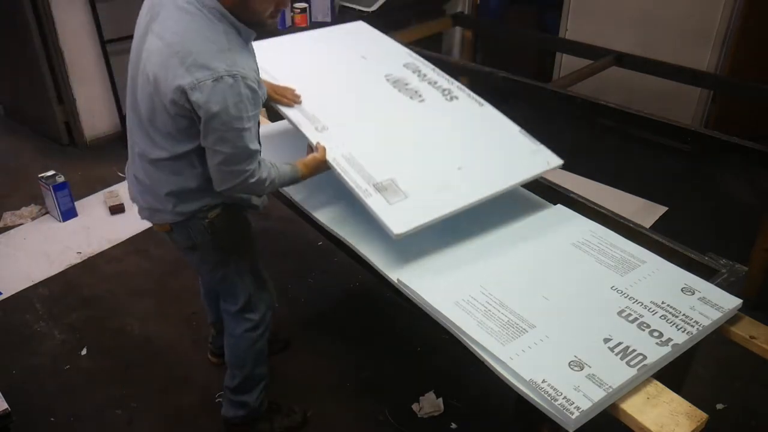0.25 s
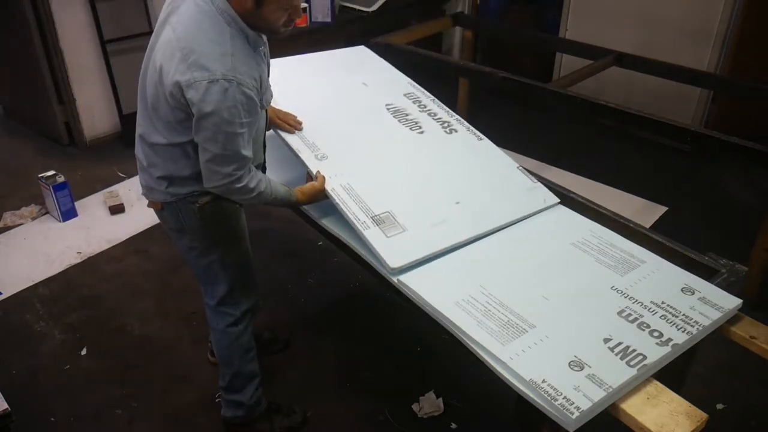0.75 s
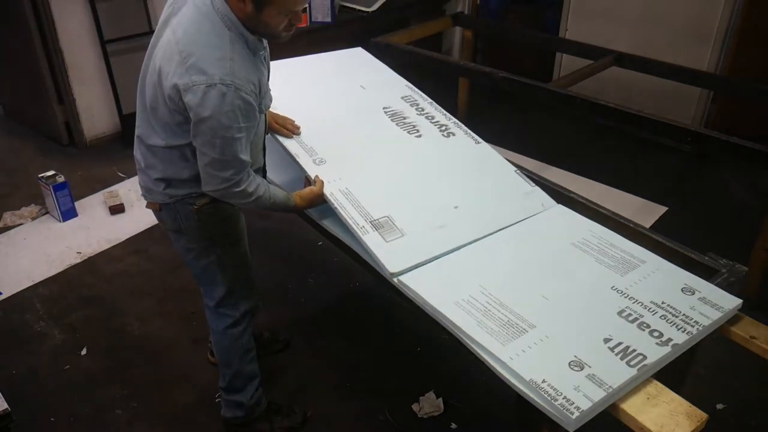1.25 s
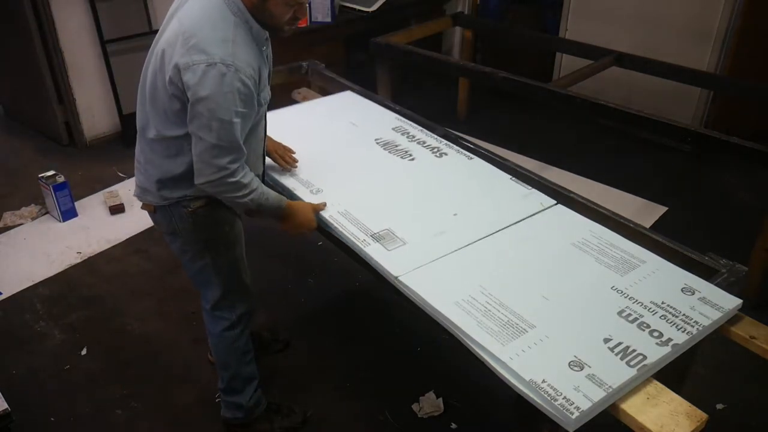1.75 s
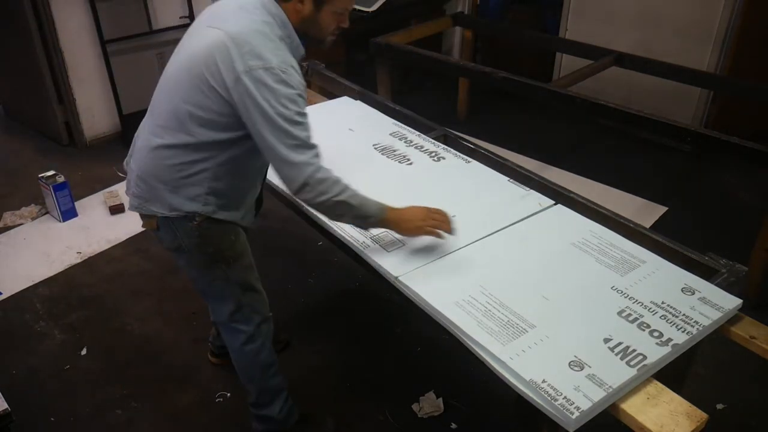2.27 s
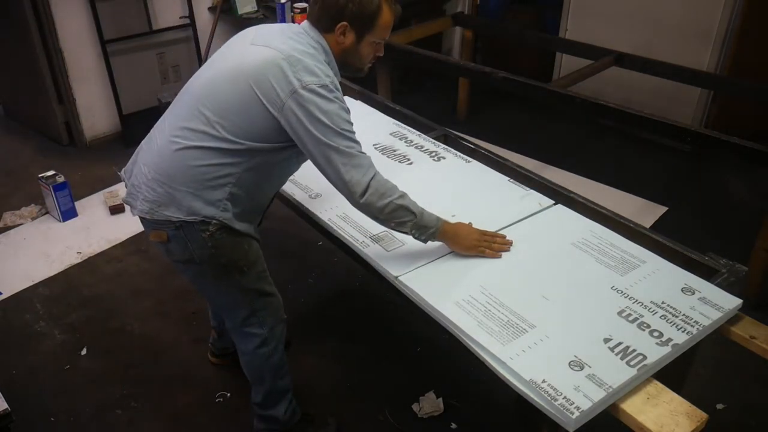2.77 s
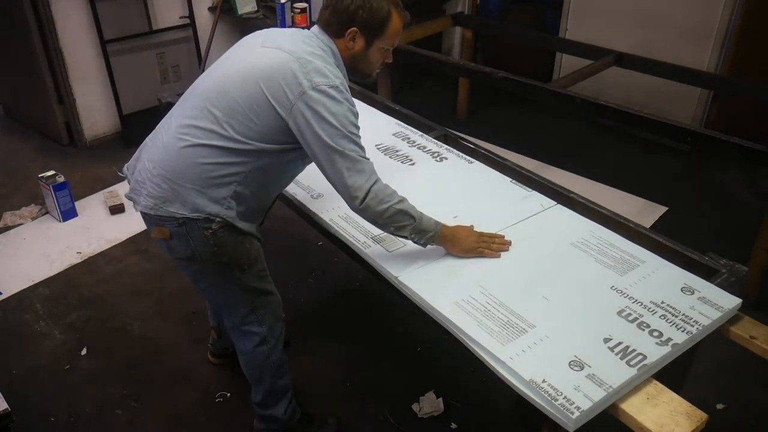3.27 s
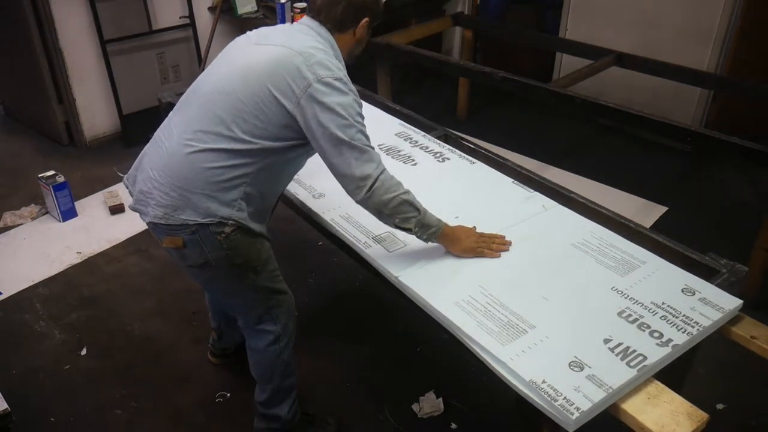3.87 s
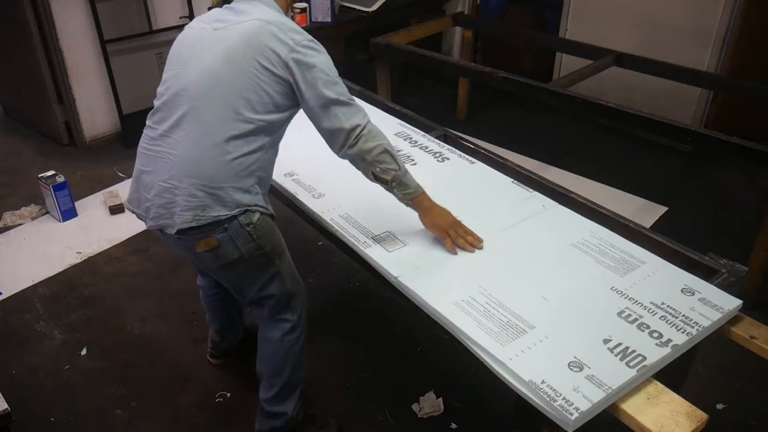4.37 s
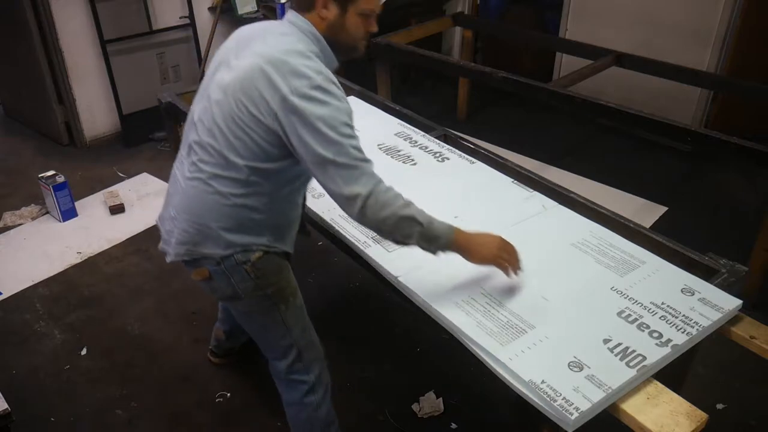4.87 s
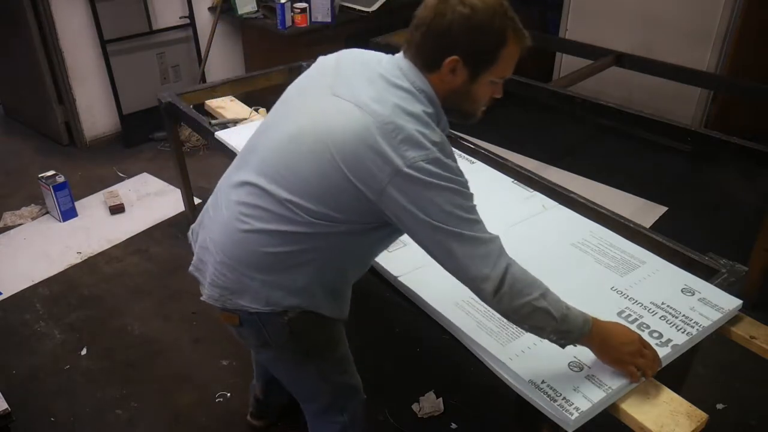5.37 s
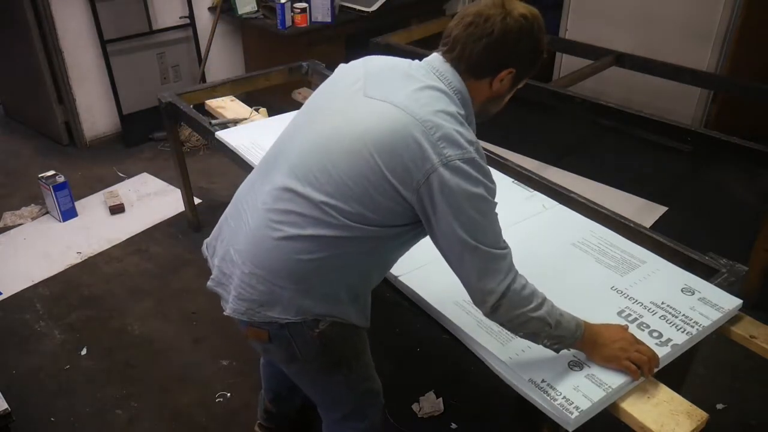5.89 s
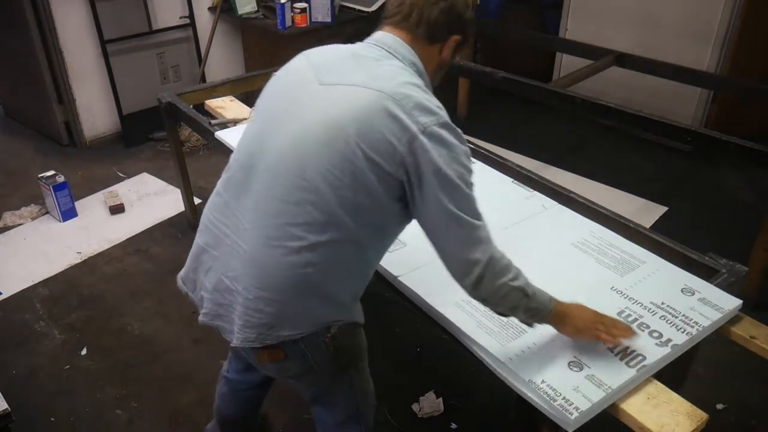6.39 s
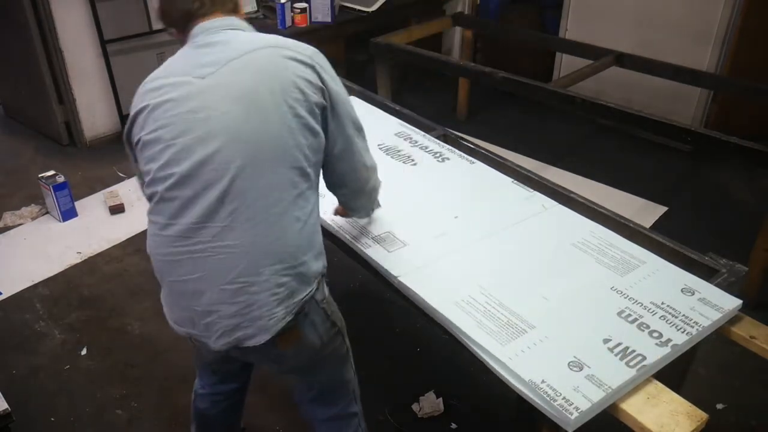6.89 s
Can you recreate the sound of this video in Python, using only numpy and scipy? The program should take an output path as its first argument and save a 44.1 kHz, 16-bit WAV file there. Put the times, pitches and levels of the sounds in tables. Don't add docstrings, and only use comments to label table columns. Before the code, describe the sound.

A reverberant, hard-walled workshop with steady low air noise and a faint machine hum that swells after the start. At about 0.1 s a rigid foam board hits another with a loud, hollow, squeaky scrape and knock, its tail ringing briefly. From 0.45 to 1.4 s come dull drags, crisp small edge taps, short dry creaks and soft low thuds near 0.6 and 1.0 s. More settling knocks fall at 1.7, 2.07 and 2.17 s, with a faint thin squeal afterwards. From 2.5 to 3.7 s it is nearly quiet: light palm brushing and tiny ticks. Around 3.8-4.6 s soft broken squeals and breathy rubs appear with a click or two. At 5.0-5.5 s strong gritty scuffs, squeaks and crunchy knocks burst out, then fade. Faint brushing leads to a sharp loud squeaky knock at 6.45 s, followed by softer rubs, sleeve rustle and tiny ticks until 7.1 s.

```python
import sys
import numpy as np
from scipy import signal
from scipy.fft import rfft, irfft
from scipy.io import wavfile

SR = 44100
rng = np.random.default_rng(int(sys.argv[2]) if len(sys.argv) > 2 else 0)


def volts(x):
    e = np.asarray(x, float) / 20
    return 10 ** e


def to_wav(s):
    ch = np.atleast_2d(s).T
    pcm = np.round(np.clip(ch, -1, 1) * 32767)
    wavfile.write(sys.argv[1], SR, pcm.astype(np.int16))


N = 314874
STEP = 32


def at_hz(points, hz):
    table = np.array(points)
    return np.interp(np.log(hz), np.log(table[:, 0]), table[:, 1])


def rms_one(x):
    return x / np.sqrt(np.mean(x ** 2) + 1e-20)


def coloured(x, spectrum):
    size = x.shape[-1]
    hz = np.maximum(np.arange(size // 2 + 1) * SR / size, 1)
    return irfft(rfft(x) * volts(at_hz(spectrum, hz)), size)


def band(x, low_hz, high_hz):
    edges_hz = [low_hz, min(high_hz, .45 * SR)]
    return signal.sosfilt(signal.butter(2, edges_hz, "band", fs=SR, output="sos"), x + 1e-18)


def resonance(x, hz, width_hz):
    r = np.exp(-np.pi * width_hz / SR)
    poles = [1, -2 * r * np.cos(2 * np.pi * hz / SR), r * r]
    return signal.lfilter([(1 - r * r) / 2, 0, (r * r - 1) / 2], poles, x + 1e-18)


def steps():
    return np.arange(N // STEP + 2) * STEP / SR


def drift(rate_hz):
    r = np.exp(-2 * np.pi * rate_hz * STEP / SR)
    wander = signal.lfilter([1], [1, -2 * r, r * r], rng.standard_normal(len(steps()) + 2000))
    return rms_one(wander[2000:])


def grit(per_s, spread_db):
    sizes = volts(spread_db * np.minimum(rng.exponential(1, N), 5)) * rng.choice([-1, 1], N)
    return rms_one(sizes * (rng.random(N) < per_s / SR))


def strokes(rows, colour, release_s, hz):
    pivot_hz = 2500
    s, rise, hold, db, tilt = np.transpose(rows)[:, :, None]
    late = steps() - s
    rising = late / np.maximum(rise, 1 / SR)
    falling = (hold - late) / release_s
    shape_db = 20 * np.minimum(np.minimum(rising, falling), 0)
    band_db = db + at_hz(colour, hz) + tilt * np.log2(hz / pivot_hz)
    return (volts(band_db) ** 2).T @ volts(shape_db) ** 2


def rubbing():
    # full_contact_s, rise_s, hold_s, level_db, tilt_db_per_octave
    slides = [(0, .05, 0.13, -47.5, -5), (.107, 0.006, 0.065, -23.5, -1), (.2, .03, 0.044, -31.5, -1),
              (.3, .03, 0.12, -45.5, -2.5), (3.93, 0.075, 0.037, -49, 1.5), (4.03, 0.053, 0.084, -33, 2.5),
              (4.2, 0.18, 0.059, -41.5, -1.5), (4.31, 0.041, 0.12, -38.5, 1), (4.44, .05, .13, -38, -0.5),
              (4.62, 0.055, 0.12, -49.5, -4), (4.96, 0.059, 0.096, -39, 1.5),
              (5.085, 0.057, 0.033, -26.5, 2.5), (5.13, 0.1, 0.083, -26, 1.5),
              (5.24, 0.057, 0.073, -24.5, 1), (5.33, 0.027, 0.067, -25, -1),
              (5.385, 0.012, 0.021, -24.5, -3), (5.44, .03, 0.1, -36, -2), (5.6, 0.064, 0.12, -48.5, -2),
              (5.75, 0.046, 0.045, -57, -3), (6.43, 0.012, 0.042, -25, 1), (6.49, .02, 0.058, -32, -2),
              (6.6, .02, 0.032, -41.5, 0.5), (6.75, 0.12, 0.1, -33.5, 0), (6.88, 0.036, 0.075, -42.5, -2.5),
              (7.03, 0.057, 0.12, -47.5, -1)]
    presses = [(.455, 0.034, 0.029, -39, 0.5), (.6, 0.029, 0.074, -39.5, -1),
               (.75, 0.011, .03, -42.5, -0.5), (.86, 0.044, 0.077, -47, -1), (.97, 0.005, 0.019, -39, 2),
               (1.02, .02, 0.049, -57.5, -4.5), (1.07, .02, 0.039, -54, 6), (1.13, .02, 0.073, -57, -2.5),
               (1.21, .02, 0.068, -48.5, 1.5), (1.4, 0.037, 0.014, -46, 0), (1.69, 0.067, 0.028, -41, 0),
               (1.79, 0.016, 0.041, -44.5, 0), (1.89, .03, 0.033, -50, 0), (2.07, 0.0077, 0.013, -36, 3.5),
               (2.172, 0.0036, 0.03, -36, 1.5), (2.25, 0.024, 0.035, -59.5, -6.5),
               (2.35, 0.022, 0.093, -51, 8), (3.97, 0.15, 0.064, -46, 0), (4.05, 0.078, 0.1, -35, 1.5),
               (4.36, 0.18, 0.25, -46, 0), (4.81, 0.024, 0.21, -53, -2), (5.4, .04, 0.025, -49, 5),
               (6.3, 0.17, 0.017, -44, 1.5), (6.44, .015, 0.019, -28, 3), (6.82, 0.2, 0.02, -33, 2.5)]
    brushes = [(.558, 0.0076, 0.0097, -44, -4.5), (.581, 0.0046, 0.016, -36.5, 3),
               (.61, 0.0087, 0.056, -42.5, 1.5), (.8, 0.15, 0.054, -46, -1.5),
               (.865, 0.07, .015, -40.5, 3.5), (1.195, 0.0092, 0.028, -47, -3.5),
               (1.4, 0.11, 0.065, -47.5, 1), (1.6, 0.14, .04, -56, -4.5), (1.69, 0.069, 0.032, -39.5, -1),
               (1.77, .03, 0.078, -47, -0.5), (1.88, .03, 0.031, -45.5, 0), (1.95, .03, 0.14, -51.5, -1.5),
               (2.07, 0.025, 0.035, -47, -1.5), (2.172, 0.0014, 0.0095, -34.5, 2),
               (2.21, .01, 0.13, -46, -3.5), (2.61, 0.07, 0.056, -52.5, 0), (2.69, 0.045, 0.058, -50, 0.5),
               (2.93, 0.046, 0.089, -59, -1), (3.3, 0.12, 0.042, -52, 1.5), (3.57, 0.061, 0.076, -45.5, 0),
               (4.83, 0.058, 0.091, -50, 0.5), (6.2, 0.1, 0.11, -52, 1), (6.29, 0.068, 0.017, -41, 2.5),
               (6.35, .02, .03, -54, -5)]
    rustles = [(0, 0.043, 0.12, -48, -4), (.77, .02, 0.09, -62, 2.5), (1.19, 0.0091, 0.018, -61, 0),
               (1.55, .04, 0.15, -63.5, 0), (1.76, .03, 0.14, -60, 1.5), (2.06, .03, 0.083, -74, -6),
               (3.87, .04, .08, -65, -1), (4.32, 0.031, 0.12, -52, 0), (4.5, .03, .04, -59, 0.5),
               (4.63, .04, 0.27, -56.5, -3), (4.9, 0.025, .06, -62, -2), (5.03, .04, 0.045, -56, 0.5),
               (6.19, .03, 0.037, -70, 3.5), (6.78, 0.076, 0.042, -55.5, 1.5), (7.1, .04, .05, -61, 0),
               (4.2, .04, .08, -58, -2.5)]
    # hz, level_db
    slide_colour = [(250, -34), (550, -17), (850, -9.5), (1300, -3.5), (1900, -6), (3100, -4),
                    (5600, -10.5), (11000, -19)]
    press_colour = [(200, -14.5), (480, -5), (850, -6), (1220, -6), (1540, -10.5), (3100, -19), (5600, -20),
                    (11000, -40)]
    brush_colour = [(200, -37), (480, -20), (850, -15.5), (1300, -6), (1900, -5.5), (3100, -4), (5600, -8),
                    (11000, -12)]
    rustle_colour = [(1300, -23), (3100, 0), (5600, 2.5), (8000, -5.5), (11000, 7), (15000, 2.5)]
    # mode_hz, width_hz, level_db
    board = [(1155, 180, 2), (3150, 4400, 3.5), (690, 300, 2.5), (4330, 200, -5.5)]

    edges_hz = 136 * 2 ** np.arange(0, 7.1, 1 / 3)
    centres_hz = np.sqrt(edges_hz[1:] * edges_hz[:-1])
    power = strokes(slides, slide_colour, 0.066, centres_hz)
    power = power + strokes(presses, press_colour, 0.071, centres_hz)
    power = power + strokes(brushes, brush_colour, 0.081, centres_hz)
    power = power + strokes(rustles, rustle_colour, .04, centres_hz)

    slips = [grit(9000, spread_db=2.5) for _ in range(2)]
    surge = drift(50)
    out = np.zeros(N)
    for k, (low_hz, high_hz, hz) in enumerate(zip(edges_hz, edges_hz[1:], centres_hz)):
        slope_db = -14.5 * max(np.log2(hz / 11000), 0) - 5.5
        waver_db = 1.2 * surge + .9 * drift(10)
        gain = np.sqrt(power[k]) * volts(slope_db + waver_db)
        noise = rms_one(band(slips[k % 2], low_hz, high_hz))
        out += np.interp(np.arange(N) / SR, steps(), gain) * noise
    return out + sum((volts(db) - 1) * resonance(out, hz, width) for hz, width, db in board)


def room_tone():
    # hz, level_db_per_hz
    air = [(12, -50), (22, -1.5), (101, 0.5), (319, -12.5), (1150, -12.5), (1660, -17.5), (3740, -19.5),
           (4060, -27), (4540, -21), (7110, -30.5), (11800, -31.5), (14700, -37), (16000, -36)]
    # time_s, level_db
    hum_swell = [(0, -16), (1.5, 9), (2.5, 5.5), (3.7, 3.5), (4.6, 11.5), (7.14, 12)]
    # hz, level_db
    self_noise = [(30, -74), (120, -87), (300, -85), (1000, -100), (5000, -103.5), (8000, -100),
                  (15000, -93)]
    mid = volts(-55) * rms_one(coloured(rng.standard_normal(N), air))
    hum = rms_one(resonance(rng.standard_normal(N), 100, width_hz=4.2))
    hum_db = -73 + np.interp(np.arange(N) / SR, *np.transpose(hum_swell))
    side = coloured(rng.standard_normal(N), self_noise) * volts(21.0)
    return mid + volts(hum_db) * hum, side


def squeaks():
    # start_s, length_s, pitch_hz, width_hz, level_db
    locked = [(.115, 0.074, 1076, 250, -31), (.11, 0.084, 2620, 1460, -30), (0.69, 0.029, 1144, 170, -42.5),
              (0.744, 0.038, 1150, 300, -46.5), (0.967, 0.033, 1120, 160, -43), (1.4, 0.05, 2900, 400, -55),
              (1.198, 0.045, 2950, 400, -54), (1.362, .04, 2950, 400, -57), (.968, .1, 850, 700, -48),
              (1.03, .05, 1180, 150, -50), (1.4, 0.04, 560, 150, -55), (1.699, 0.072, 5080, 830, -50),
              (2.171, 0.039, 5200, 900, -45), (2.182, 0.11, 1240, 180, -43), (4.29, .08, 3000, 200, -52),
              (6.462, .06, 1150, 300, -33), (6.5, .1, 900, 400, -36), (6.455, .04, 3200, 700, -33),
              (1.4, 0.025, 1000, 150, -57), (0.84, 0.064, 2860, 630, -52.5),
              (5.241, 0.05, 1145, 190, -32.5), (5.4, 0.12, 2320, 1100, -36.5),
              (5.378, 0.035, 1170, 260, -26), (6.424, 0.031, 3200, 620, -30.5),
              (0.09, 0.034, 1130, 120, -48), (.11, 0.118, 740, 200, -41), (0.24, .09, 782, 150, -45),
              (2.172, 0.043, 1720, 120, -45), (2.172, 0.035, 554, 200, -45.5), (4.8, .05, 650, 300, -58),
              (5.2, 0.044, 1220, 260, -36), (5.415, 0.035, 1260, 140, -33),
              (5.375, 0.034, 2200, 500, -31.5), (.592, 0.055, 650, 240, -47), (.99, 0.039, 420, 200, -50),
              (1.025, 0.032, 1130, 200, -51), (4.045, .04, 510, 170, -49), (1.705, 0.057, 646, 200, -49),
              (2.065, .04, 600, 200, -52.5), (3.94, 0.043, 1120, 110, -53), (1.665, 0.024, 2600, 2300, -45),
              (1.795, 0.052, 1000, 830, -51), (1.73, 0.065, 3600, 500, -54)]
    white = rng.standard_normal((len(locked), SR // 4))
    t, out = np.arange(SR // 4) / SR, np.zeros(N)
    for noise, (s, length, hz, width, db) in zip(white, locked):
        gate = np.clip(np.minimum(t / 0.00032, (length - t) / 0.027), 0, 1)
        tone = rms_one(resonance(resonance(noise, hz, width), hz, width))
        out[round(s * SR):][:len(t)] += volts(db + 5.0) * gate * tone
    return out


def knocks():
    # start_s, peak_db, low_above_peak_db, bright_above_peak_db, contact_s
    edge_knocks = [(0.104, -24, -5, -28, 0.0081), (0.558, -30, -13, 3, 0.0039), (.578, -31, -1, 13, 0.011),
                   (.9677, -60, 22, -14, 0.026), (1.1854, -51, 3, -20, 0.014), (1.396, -46, 4, -7, 0.0071),
                   (1.701, -25, -14, -12, 0.018), (2.068, -40, -14, -4, 0.014), (2.171, -24, 0, -29, 0.012),
                   (5.06, -30, -5, -14, 0.01), (5.379, -21, -7, -20, 0.0035), (5.388, -22, -21, -16, 0.004),
                   (6.418, -25, 5.5, -9, 0.014), (6.424, -34, -14, 2, 0.0087), (0.46, -45, 7, -15, 0.01),
                   (.748, -64, 9, -6, .012), (0.869, -37, -1, 12, 0.0085), (6.3, -38.5, -8, 12, 0.012),
                   (6.444, -10, -19, -16, 0.0073), (6.462, -22, -1, -10, 0.0069),
                   (0.132, -13.5, -1, -25, 0.0049), (4.553, -37, 4, -14, 0.01)]
    crunch = grit(12000, spread_db=1.5)
    out, t = np.zeros(N), np.arange(SR // 5) / SR
    ranges_hz = [(300, 810), (1500, 5700), (6000, 15200)]
    low, middle, bright = [rms_one(band(band(crunch, *hz), *hz)) for hz in ranges_hz]
    for s, db, low_db, bright_db, contact in edge_knocks:
        start = round(s * SR)
        span = slice(start, start + len(t))
        shape = burst(t, 0.00018, max(contact, .001))
        mixed = volts(low_db) * low[span] + middle[span] + volts(bright_db) * bright[span]
        out[span] += volts(db - 8.5) * shape * mixed
    return out


def burst(t, rise_s, fall_s):
    return (1 - np.exp(-t / rise_s)) * np.exp(-t / fall_s)


def ticks():
    # start_s, peak_db, low_hz, high_hz
    grains = [(2.5737, -45, 500, 3200), (5.381, -18, 900, 3500), (5.353, -19, 900, 4000),
              (6.656, -44, 3000, 9000), (4.556, -32, 1500, 5000), (5.244, -20, 900, 4000),
              (.14, -19, 1000, 4000), (.153, -20, 1000, 4000), (4.104, -28, 800, 4000),
              (4.815, -29, 3000, 17500), (3.5264, -49, 5000, 16000), (3.925, -44, 1800, 9000),
              (5.9207, -46.5, 500, 2560), (6.196, -45, 5000, 13000), (6.633, -40, 5000, 11000),
              (7.0284, -45, 4500, 11000), (6.234, -42, 600, 2800), (7.0574, -52, 2000, 6000)]
    snap_s = .00025
    out, t = np.zeros(N), np.arange(800) / SR
    noise = rng.standard_normal((len(grains), 800))
    for crackle, (s, db, low_hz, high_hz) in zip(noise, grains):
        snap = crackle * np.exp(-t / snap_s)
        click = band(band(snap, low_hz, high_hz), low_hz, high_hz)
        out[round(s * SR):][:800] += volts(db + 3.0) * click / np.max(np.abs(click))
    return out


def thuds():
    # start_s, peak_db, pitch_hz
    flexes = [(0.596, -31, 103), (.63, -53, 100), (0.986, -33, 106), (1.811, -37.5, 168), (2.166, -33, 124),
              (3.96, -43, 169), (4.334, -38.5, 116), (0.658, -45, 102), (1.011, -48, 100)]
    t, out = np.arange(SR // 3) / SR, np.zeros(N)
    puff = rms_one(band(rng.standard_normal(N), 118, 290))
    for s, db, hz in flexes:
        start = round(s * SR)
        span = slice(start, start + len(t))
        flex = burst(t, 0.0036, 0.015) * np.sin(2 * np.pi * hz * t)
        air = 0.39 * burst(t, 0.0072, 0.044) * puff[span]
        out[span] += volts(db - 1.0) * (flex + air)
    return out


def squeals():
    # start_s, length_s, from_hz, to_hz, level_db
    glides = [(3.806, 0.093, 1116, 1055, -54), (3.928, 0.065, 770, 830, -51),
              (3.986, 0.076, 893, 1022, -46), (4.059, 0.068, 1008, 900, -48),
              (3.89, 0.123, 4370, 4300, -64), (3.921, 0.093, 2980, 2930, -56), (2.33, .1, 1290, 1240, -54),
              (2.435, .035, 1320, 1340, -58), (2.5, .05, 1270, 1310, -63), (2.405, .09, 2200, 2210, -63),
              (2.24, .07, 1260, 1240, -50)]
    width_hz, edge_s, rough = 80, 0.012, .8
    white = rng.standard_normal((len(glides), 2, SR // 4))
    t, out = np.arange(SR // 4) / SR, np.zeros(N)
    for noise, (s, length, from_hz, to_hz, db) in zip(white, glides):
        one, other = rms_one(signal.lfilter(*signal.butter(2, width_hz, fs=SR), noise))
        phase = 2 * np.pi * (from_hz * t + (to_hz - from_hz) * t ** 2 / (2 * length))
        gate = np.clip(np.minimum(t, length - t) / edge_s, 0, 1)
        tone = (1 + rough * one) * np.sin(phase) + rough * other * np.cos(phase)
        out[round(s * SR):][:len(t)] += volts(db) * gate * tone
    return out


def workshop(x):
    # hz, t60_s
    room_t60 = [(100, 0.7), (500, 0.63), (1500, 0.59), (4000, 0.62), (8000, 0.45), (15000, 0.26)]
    # hz, side_minus_mid_db
    side_leak = [(60, -24), (400, -21.5), (1000, -30.5), (2500, -31.5), (4500, -31.5), (8000, -29),
                 (14000, -21)]
    direct_share = 0.56
    direct_leak = 0.9
    places = 150

    t, white, layers = np.arange(SR * 3 // 4) / SR, rng.standard_normal((2, SR * 4)), []
    edges_hz = 45 * 2. ** np.arange(0, 9.1, .5)
    for k, (low_hz, high_hz) in enumerate(zip(edges_hz, edges_hz[1:])):
        t60 = at_hz(room_t60, np.sqrt(low_hz * high_hz))
        unit_energy = np.sqrt(2 * np.log(1000) / (t60 * SR))
        fade = volts(-60 * t / t60) * np.clip(t / .008, 0, 1) * unit_energy
        layers.append((fade, band(white[k % 2], low_hz, high_hz)))

    hop, wet = N // places + 1, np.zeros((2, N))
    padded = np.pad(x, (hop, 2 * hop))
    window = np.sin(np.pi * np.arange(2 * hop) / (2 * hop))
    for place in range(places + 1):
        tail = sum(fade * noise[place * 2111 % (3 * SR):][:len(t)] for fade, noise in layers)
        answer = signal.fftconvolve(window * padded[place * hop:][:2 * hop], tail)
        start = (place - 1) * hop
        part = wet[place % 2, max(start, 0):start + len(answer)]
        part += answer[max(-start, 0):][:len(part)]
    wet *= np.sqrt(1 - direct_share)

    mid = np.sqrt(direct_share) * x + wet[0] + wet[1]
    quarter_turn = irfft(1j * rfft(x), N)
    side = coloured(wet[0] - wet[1] + direct_leak * quarter_turn, side_leak)
    return mid, side


def scene():
    rub, squeak = rubbing(), squeaks()
    near = 0.46 * thuds() + 0.33 * knocks()
    snaps, thin = ticks(), squeals()
    mid, side = workshop(rub + squeak + thin + 1.57 * near + 0.54 * snaps)
    air_mid, air_side = room_tone()
    mid = mid + near + .4 * thin + 1.04 * snaps + air_mid
    side = side + air_side
    return np.array([volts(0.91) * (mid + side), volts(0.99) * (mid - side)])


def band_limit(x):
    return signal.sosfilt(signal.butter(12, 16510, fs=SR, output="sos"), x)


def record(dry):
    top_cut = signal.cheby2(14, 60, 15950, fs=SR, output="sos")
    return band_limit(signal.sosfilt(top_cut, dry))


dry = scene()
out = record(dry)
to_wav(out)
```